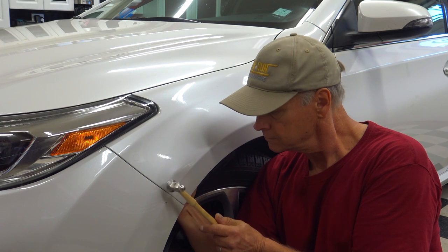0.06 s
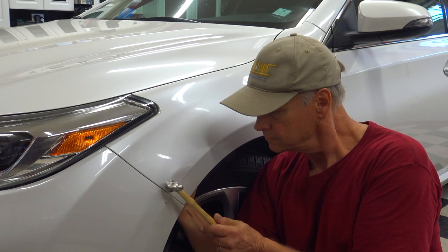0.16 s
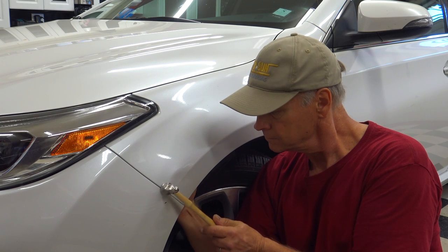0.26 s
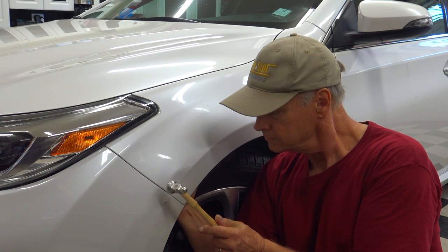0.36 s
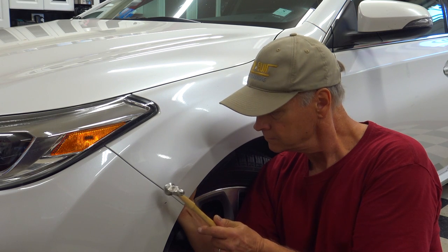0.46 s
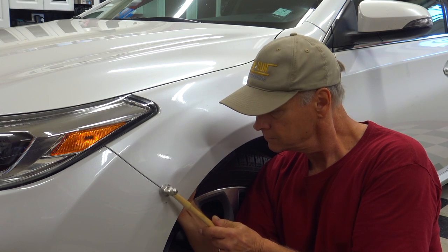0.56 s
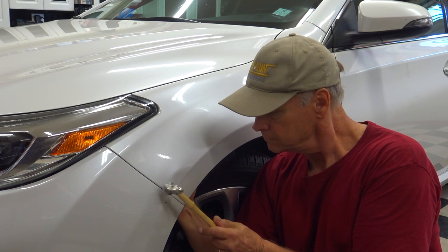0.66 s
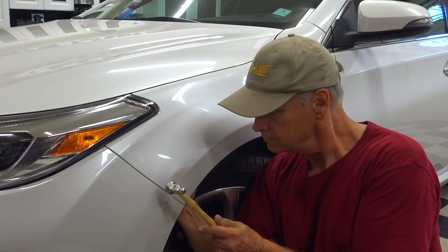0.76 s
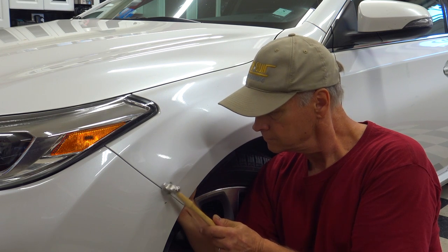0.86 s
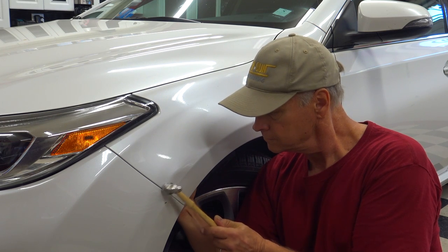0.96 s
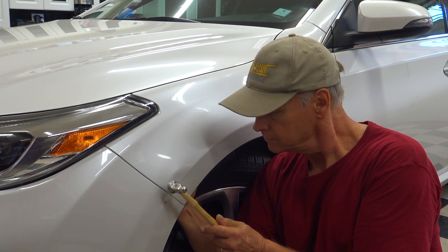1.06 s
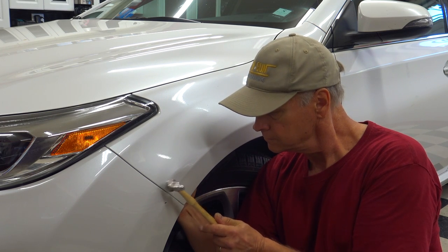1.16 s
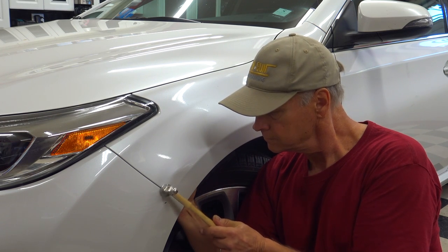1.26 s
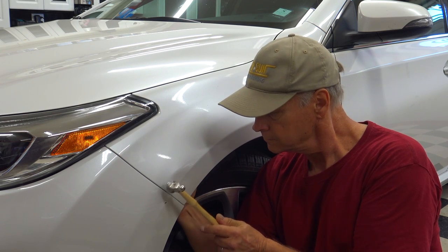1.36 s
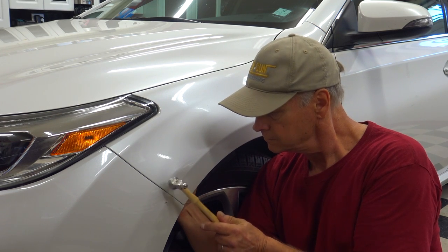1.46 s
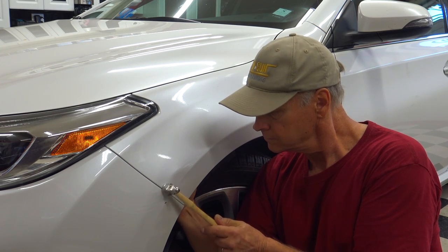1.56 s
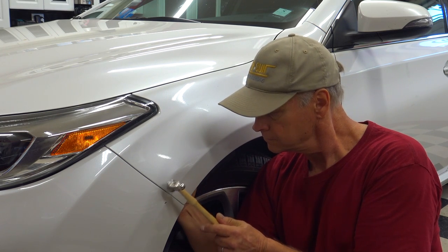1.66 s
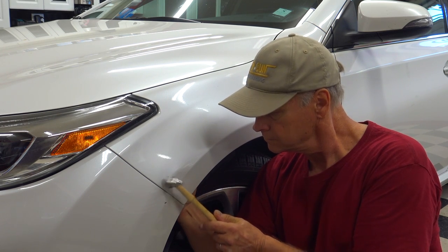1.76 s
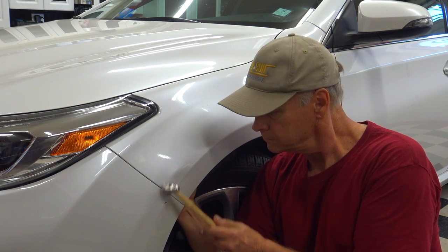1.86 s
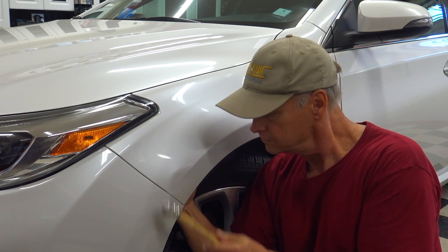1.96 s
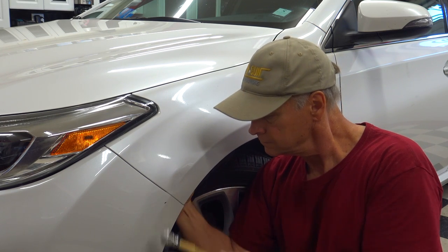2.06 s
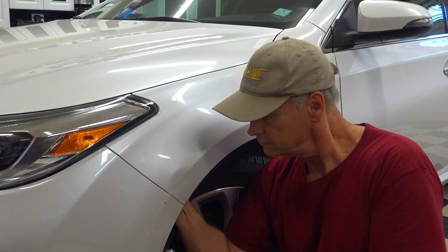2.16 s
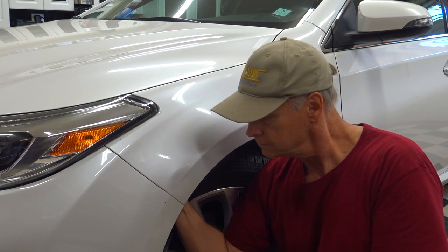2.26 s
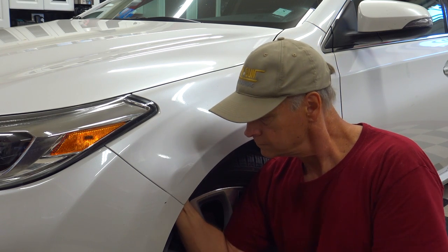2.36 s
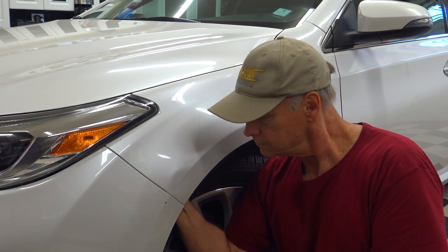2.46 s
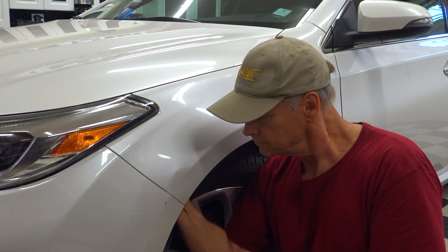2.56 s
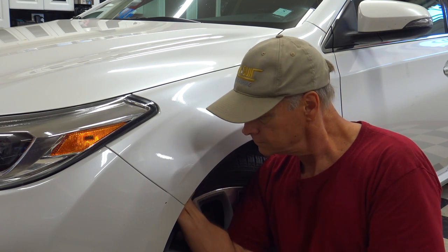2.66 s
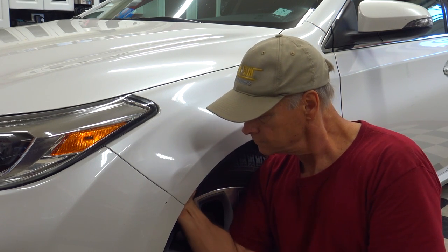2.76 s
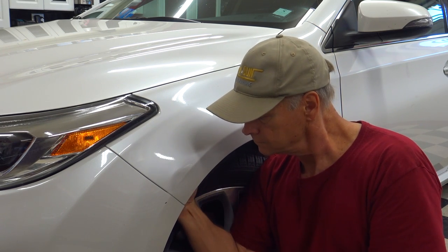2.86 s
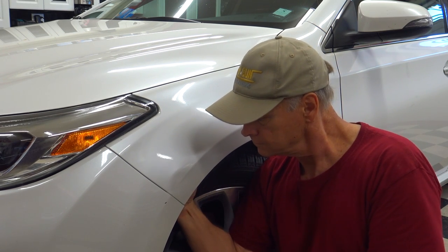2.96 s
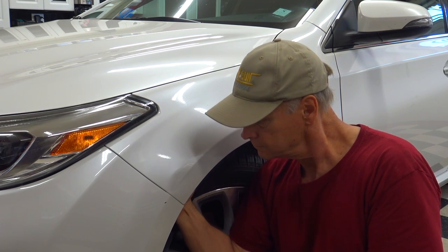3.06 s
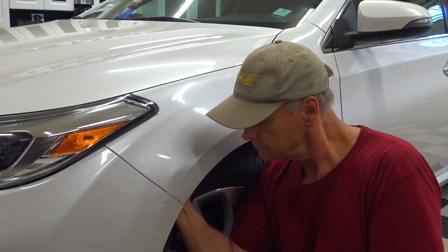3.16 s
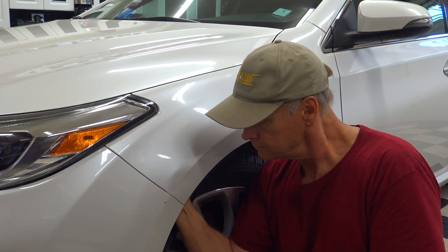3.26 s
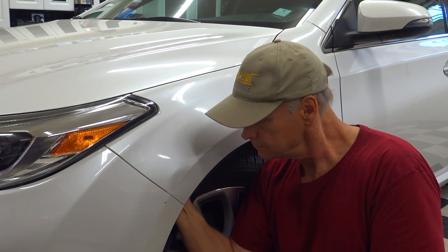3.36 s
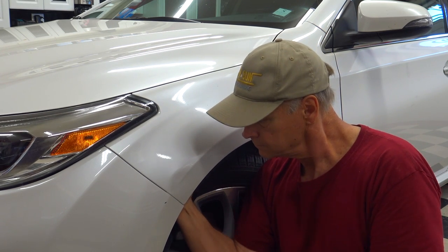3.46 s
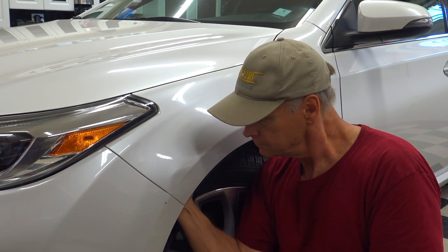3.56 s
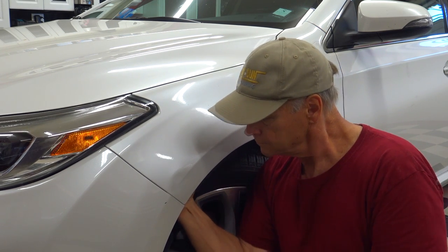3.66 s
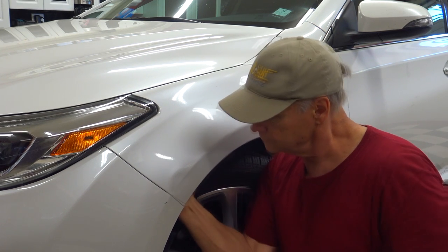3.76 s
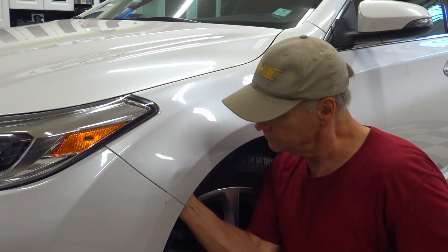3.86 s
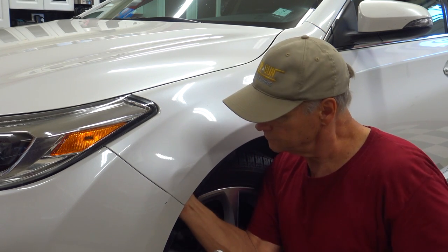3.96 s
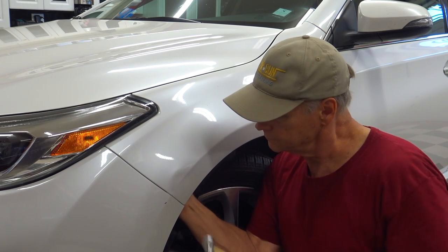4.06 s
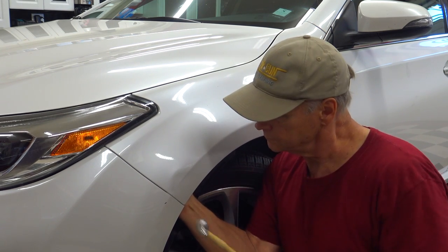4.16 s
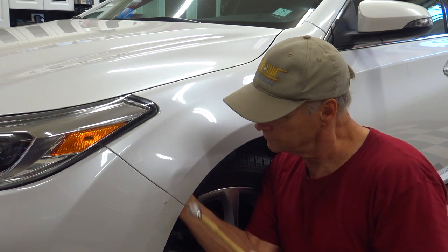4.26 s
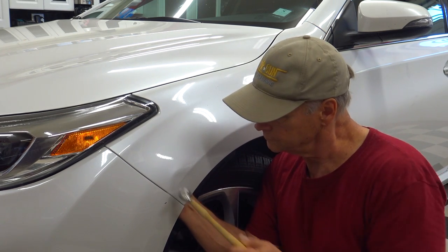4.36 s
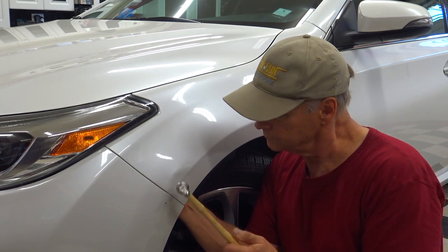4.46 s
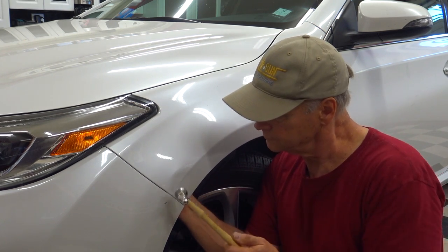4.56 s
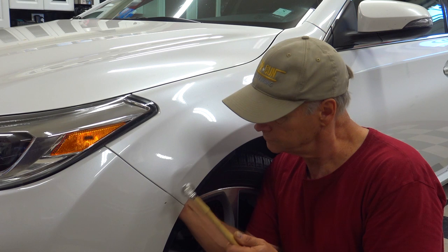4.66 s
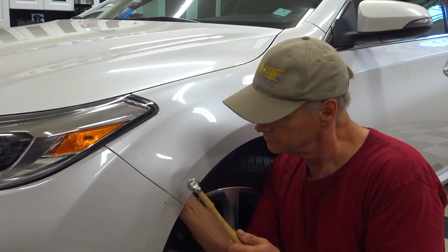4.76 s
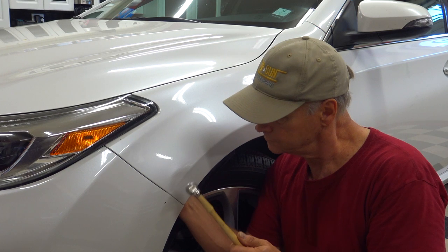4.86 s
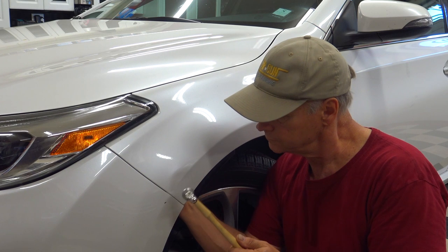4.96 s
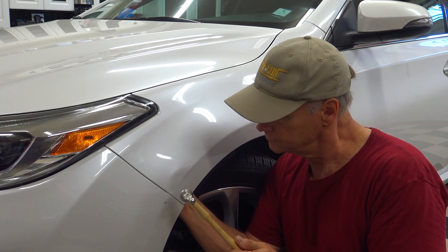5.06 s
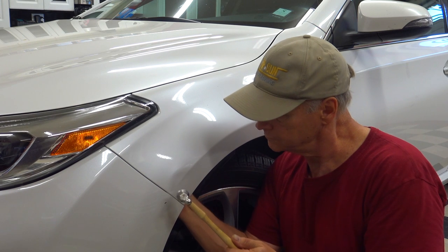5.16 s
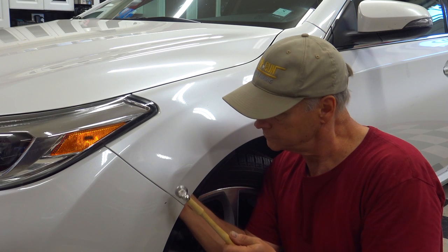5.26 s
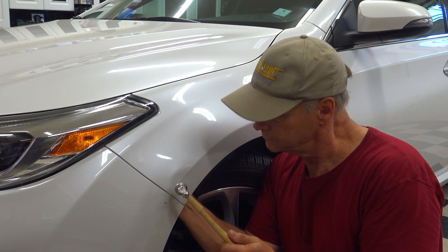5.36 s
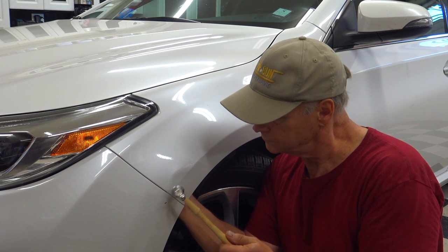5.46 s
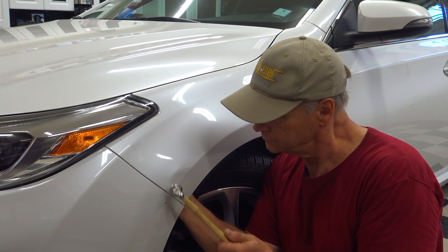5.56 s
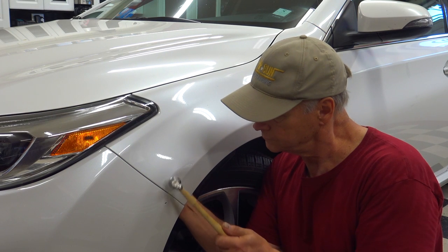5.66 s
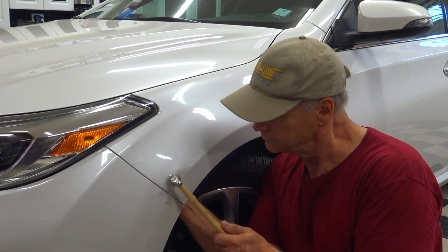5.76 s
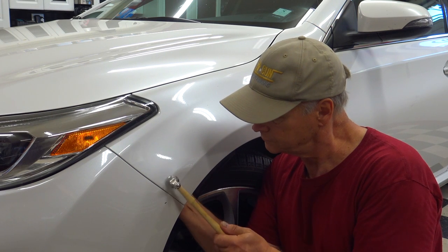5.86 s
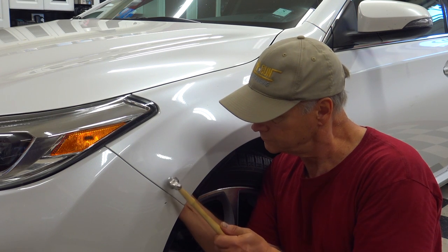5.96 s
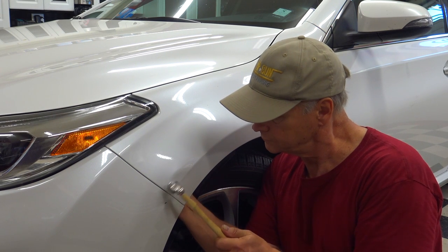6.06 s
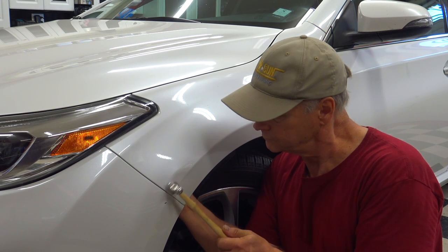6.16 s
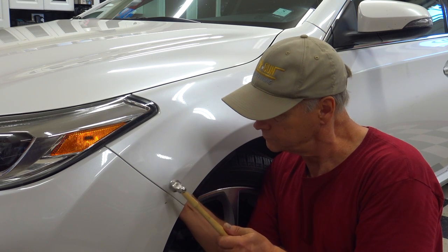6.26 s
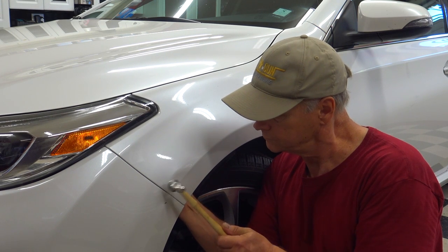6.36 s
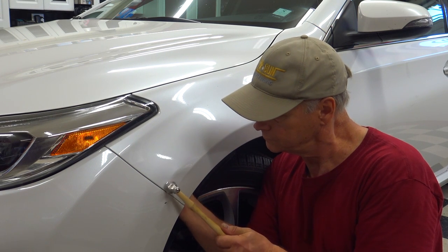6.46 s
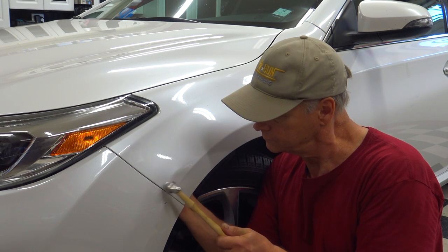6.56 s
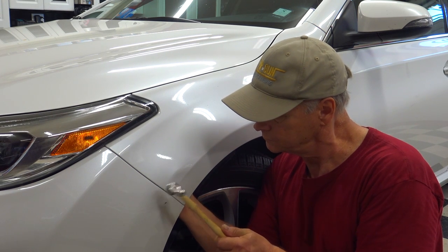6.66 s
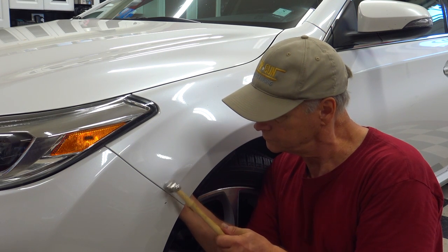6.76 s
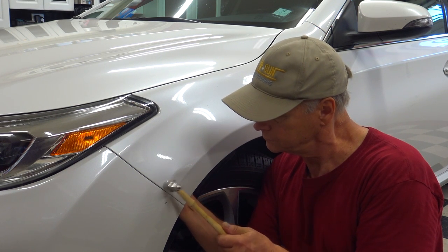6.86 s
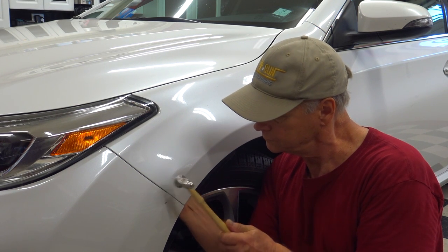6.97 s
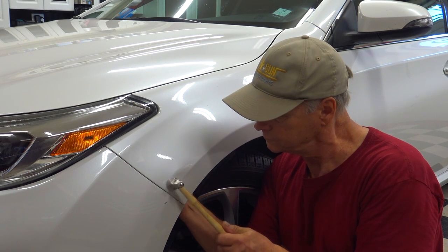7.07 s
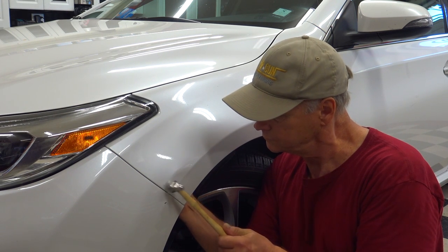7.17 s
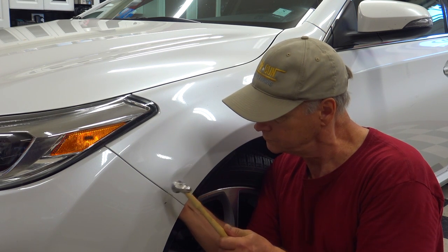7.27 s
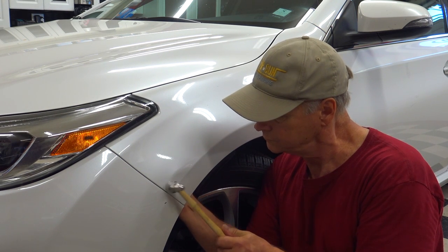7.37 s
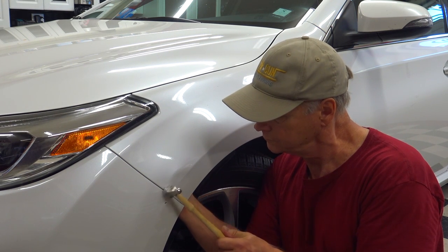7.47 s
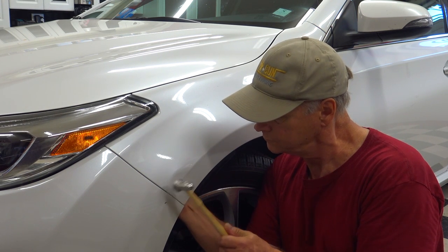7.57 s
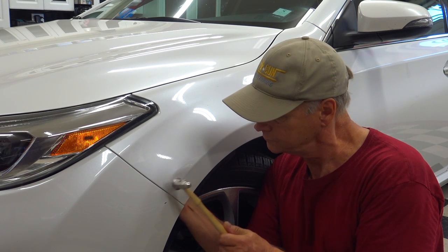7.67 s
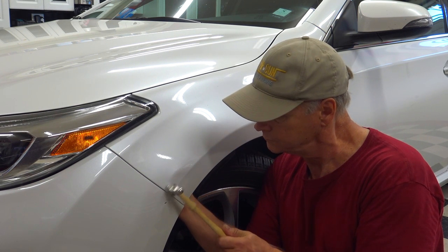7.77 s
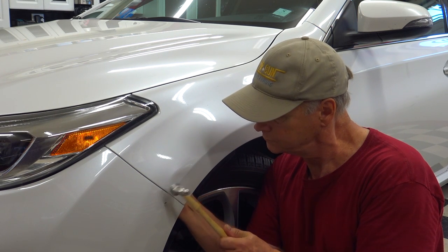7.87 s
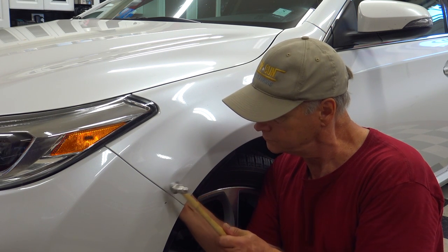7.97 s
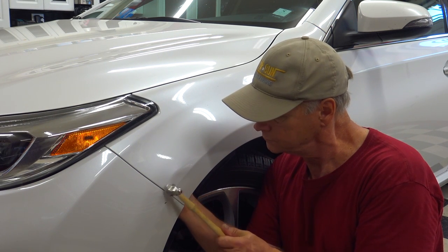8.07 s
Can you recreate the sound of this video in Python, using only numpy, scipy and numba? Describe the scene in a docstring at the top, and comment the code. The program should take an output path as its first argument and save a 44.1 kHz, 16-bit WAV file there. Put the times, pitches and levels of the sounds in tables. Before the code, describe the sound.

A small hammer cracks on block-backed sheet metal, pauses for soft bumps and rubbing while a fan machine starts, then strikes five firmer, clanging blows.

```python
"""A small hammer taps a car's steel fender backed by a hand-held block, in a hard-walled workshop.
Each tap is a crack, a noisy clash, ringing modes, a clink and an echo; after most, the block bounces back.
Seven taps, then knocks, ticks and scrapes as the block is shifted behind the panel, then five firmer taps.
Filtered noise and tones make the workshop's air and hum; a machine starts up about halfway and hums on.
A slow-reacting limiter lets hard attacks clip, then lets go as the echo fades."""
import sys
import numpy as np
from scipy import signal
from scipy.fft import rfft, irfft
from scipy.io import wavfile
from scipy.ndimage import uniform_filter1d, map_coordinates
from numba import njit

SR = 44100
rng = np.random.default_rng(int(sys.argv[2]) if len(sys.argv) > 2 else 0)


def waveform_to_disk(signal):
    """Save audio, clipped to [-1, 1], as 16-bit WAV at the path in sys.argv[1]."""
    frames = np.transpose(np.atleast_2d(signal))
    scaled = np.clip(frames, -1, 1) * 32767
    samples = np.round(scaled).astype(np.int16)
    wavfile.write(sys.argv[1], SR, samples)


N = 357210
t = np.arange(SR) / SR
HZ = np.fft.rfftfreq(SR, 1 / SR)
TIME = np.arange(N) / SR

# hammer taps: (time [s], force [dB], clang centre [Hz], clang boost [dB],
#   delay until the block bounces back [s]; 0 = it stays on the sheet)
HAMMER_TAPS = [(0.009, -4.5, 1490, 0.5, .058), (0.2834, -4.5, 1534, 2.5, 0), (0.606, -0.2, 2673, 14, .046),
               (0.9542, -4.5, 1855, 6.5, .043), (1.2829, -3, 2250, 7, .0335),
               (1.5945, -3.5, 1680, 3, .0386), (1.865, -4.5, 314.6, 4, .048), (6.536, 4, 1555, 9, 0),
               (6.8524, 5.5, 944, 7.5, 0), (7.1399, 7.5, 722, 5.5, .036), (7.4693, 7.5, 836, 3.5, .040),
               (7.8076, 3.5, 742, 3.5, 0)]
# dull colour of handling bumps: (frequency [Hz], level [dB])
THUD_COLOUR = [(25, -30), (70, 8), (130, 6.5), (330, 4), (700, -5.5), (1000, -8), (1500, -13),
               (3300, -26.5), (6000, -42), (15000, -48)]


def amp(db):
    """Decibels to gain."""
    return 10 ** (np.asarray(db) / 20)


def unit(x):
    """Scale to rms 1."""
    return x / np.sqrt(np.mean(x ** 2) + 1e-20)


def along(points, hz):
    """Interpolate (Hz, value) points on a log frequency axis."""
    f, v = np.transpose(points)
    return np.interp(np.log(hz + 1), np.log(f + 1), v)


def fade(t60_s):
    """One second of exponential decay, -60 dB at t60."""
    return np.exp(-np.log(1000) * t / t60_s)


def peak(centre_hz, width_hz):
    """A resonance of height 1."""
    return 1 / (1 + (2 * (HZ - centre_hz) / width_hz) ** 2)


def shelf(hz, corner_hz):
    """Rises from 0 to 1 around the corner."""
    return hz ** 2 / (hz ** 2 + corner_hz ** 2)


def ripple(spacing_hz):
    """Random crests and troughs along frequency, as a crowd of close modes of like strength makes them."""
    crests = map_coordinates(rng.standard_normal(SR // 2), [HZ / spacing_hz])
    return np.tanh(crests) * shelf(HZ, 900)


def noise(colour_db, size=SR):
    """Noise of rms 1 with the given spectrum."""
    return unit(irfft(rfft(rng.standard_normal(size)) * amp(colour_db), size))


def pulse(colour_db):
    """Minimum-phase answer of a body to one sharp push, with the energy of 1 ms at rms 1."""
    cepstrum = irfft(np.log(amp(colour_db)))
    # folding the cepstrum makes the response causal
    cepstrum[1:SR // 2] *= 2
    cepstrum[SR // 2:] = 0
    response = irfft(np.exp(rfft(cepstrum)))
    return unit(response) / np.sqrt(1000)


def echo(colour_db, build_s):
    """The workshop's answer: diffuse noise builds up, then each band dies at its own speed."""
    # decay of the workshop echo: (frequency [Hz], t60 [s])
    room_t60 = [(70, 0.59), (250, 0.47), (700, 0.57), (1800, 0.65), (4000, 0.71), (8000, 0.55),
                (14000, 0.31)]
    hz, s, bands = signal.stft(noise(colour_db), SR, nperseg=512)
    decay = np.exp(-np.log(1000) * s / along(room_t60, hz)[:, None])
    tail = signal.istft(bands * decay, SR, nperseg=512)[1][:SR]
    return tail * (1 - np.exp(-t / build_s))


def add(track, s, sound):
    """Mix a sound in at time s."""
    start = max(round(s * SR), 0)
    track[start:start + len(sound)] += sound[:N - start]


def air(treble_db):
    """Moving air: coloured noise, with its treble raised or lowered."""
    # workshop air: (frequency [Hz], level [dB])
    air_colour = [(20, -4), (35, 0.5), (90, 0.5), (150, -10), (400, -14), (750, -25.5), (1050, -20),
                  (1400, -30.5), (2400, -33), (3500, -32), (5000, -36), (15500, -38)]
    hz = np.fft.rfftfreq(N, 1 / SR)
    rush = noise(along(air_colour, hz), size=N)
    treble = irfft(rfft(rush) * shelf(hz, 3000), N)
    return rush + (amp(treble_db) - 1) * treble


def tone(pitch_hz):
    """A line of hum of rms 1; a wandering phase makes it slightly unsteady."""
    drift = map_coordinates(rng.standard_normal(64), [TIME * 4])
    return np.sqrt(2) * np.sin(2 * np.pi * pitch_hz * TIME + 0.35 * drift)


def background():
    """Steady workshop air and low hum; a machine with a fan runs up and adds its own rush and hum."""
    # machine lines: (frequency [Hz], relative level [dB])
    hum_lines = [(53.8, -1), (70, -3), (107.7, -0.5), (145.3, -12.5), (215.3, -16), (323, -19.5)]
    room_air_db, room_treble_db, low_hum_db = -51.5, -6, -50.5
    half_speed_s, run_up_s = 3.786, 0.04
    fan_air_db, fan_treble_db, machine_hum_db = -41, -2.5, -39.5  # at full speed
    room = amp(room_air_db) * air(room_treble_db) + amp(low_hum_db) * tone(75.4)
    running = (1 + np.tanh((TIME - half_speed_s) / (2 * run_up_s))) / 2
    hum = sum(amp(db) * tone(hz) for hz, db in hum_lines)
    machine = amp(fan_air_db) * air(fan_treble_db) + amp(machine_hum_db) * hum
    return room + running * machine


def fender():
    """Colour of the sheet [dB]: broad resonances under a crowd of fine ones."""
    # smooth colour of the struck sheet: (frequency [Hz], level [dB])
    sheet_colour = [(25, -34), (50, -27.5), (75, -0.5), (160, -1), (380, 5.5), (1000, -1), (2200, -7.5),
                    (3600, -11), (5000, -17), (7000, -24.5), (11000, -28), (15500, -32.5)]
    # broad resonances: (centre [Hz], width [Hz], boost [dB])
    broad_peaks = [(207, 54, 3), (481, 41, 4), (754, 140, 5.5), (1544, 630, 8.5), (2720, 120, 3),
                   (3280, 410, 6), (4470, 180, 1), (5230, 450, 2.5)]
    broad = along(sheet_colour, HZ) + sum(db * peak(hz, width) for hz, width, db in broad_peaks)
    fine = 4 * ripple(spacing_hz=12) + 4 * ripple(spacing_hz=70) * shelf(HZ, 3500)
    return broad + fine


def ring(contact_hz):
    """Decaying sheet modes, at new strengths for every blow; a soft contact favours the low ones."""
    # ringing modes: (frequency [Hz], mean relative level [dB], t60 [s])
    modes = [(71.15, -9, 0.42), (213, -12.5, 0.68), (390, -14, 0.41), (477, -9.5, 0.7), (509, -13, 0.94),
             (590, -7, 0.36), (622, 2, 0.48), (734, -9.5, 0.53), (1044, -15.5, 0.31), (1180, -5, 0.38),
             (1386, -5, 0.49), (1550, -10, 0.8), (1827, -12, 0.83), (2020, -12, 0.28), (2159, -13, 0.8),
             (2654, -12, 0.3), (2640, -16.5, 0.48), (3080, -11, 0.61), (3120, -14.5, 0.49),
             (3460, -15.5, 0.76), (4270, -24.5, .65), (5200, -25, 0.89), (5300, -25, 0.86),
             (6400, -18.5, 0.42), (7650, -27, .5), (9660, -27, .5)]
    out = np.zeros(SR)
    for hz, db, t60_s in modes:
        wave = np.sin(2 * np.pi * (hz * t + rng.random())) / (1 + (hz / contact_hz) ** 2)
        out += amp(db + 2 * rng.normal()) * fade(t60_s) * wave
    return out


def backed(steel, force_db, clang_hz, clang_db):
    """The backed spot sets the clang band; force adds treble, and pins the sheet so it drums less."""
    drum_db_at_0, drum_loss_per_db = 9.5, 0.77
    treble_db_at_0, treble_per_db = 8.5, 0.58
    clang = np.exp(-(np.log2((HZ + 1) / clang_hz) / 0.67) ** 2)
    brightness = shelf(HZ, 4000) - 0.34 * shelf(HZ, 10000)
    drum_db = drum_db_at_0 - drum_loss_per_db * force_db
    treble_db = treble_db_at_0 + treble_per_db * force_db
    return steel + drum_db * peak(619, 60) + clang_db * clang + treble_db * brightness


def hammer(steel):
    """Each tap: a crack, a short noise clash of bending waves, ringing modes and the room."""
    # ping of the spot under the hammer face: (centre [Hz], width [Hz], boost [dB])
    ping = [(430, 100, 8), (1229, 200, 6.5), (1453, 61, 5), (2240, 88, 7), (3620, 150, -1)]
    # clash thrown back by the floor and the car's body: (delay [s], level [dB])
    reflections = [(0.0135, -16.5), (0.0262, -21)]
    out = np.zeros(N)
    # the first wave comes from a small spot, which pings and radiates little bass
    spot = sum(db * peak(hz, width) for hz, width, db in ping)
    spot = spot + 5 * shelf(HZ, 4000) - 13 * (1 - shelf(HZ, 280))
    for s, force_db, clang_hz, clang_db, _ in HAMMER_TAPS:
        colour = backed(steel, force_db, clang_hz, clang_db)
        crack = amp(11.5) * pulse(colour + spot)
        clash = amp(5) * noise(colour + spot) * fade(0.045)
        direct = crack + clash
        ringing = amp(-11.5) * ring(contact_hz=14000)
        add(out, s, amp(force_db) * (direct + echo(colour, build_s=0.034) + ringing))
        for delay_s, db in reflections:
            add(out, s + delay_s, amp(force_db + db) * direct)
    return out


def clinks(steel):
    """Steel on steel: the hammer head rings for a few milliseconds at each tap, as a noise burst."""
    # head resonances: (centre [Hz], width [Hz], boost [dB])
    head_peaks = [(1480, 350, 12.5), (3570, 430, 12.5), (4420, 500, 9)]
    clink_db, clink_t60_s = 7, 0.0092  # level relative to tap force
    out = np.zeros(N)
    head = sum(db * peak(hz, width) for hz, width, db in head_peaks)
    head = head - 22 * (1 - shelf(HZ, 600)) - 4 * shelf(HZ, 7000)
    for s, force_db, clang_hz, clang_db, _ in HAMMER_TAPS:
        colour = backed(steel, force_db, clang_hz, clang_db) + head
        add(out, s, amp(force_db + clink_db) * noise(colour) * fade(clink_t60_s))
    return out


def bounces(steel):
    """The block is thrown off the sheet and lands on the same spot with a bright clack."""
    bounce_db = -2  # relative to tap force
    out = np.zeros(N)
    for s, force_db, clang_hz, clang_db, delay_s in HAMMER_TAPS:
        if delay_s > 0:
            colour = backed(steel, force_db, clang_hz, clang_db)
            colour = colour + 2 * shelf(HZ, 5000) + 6 * shelf(HZ, 500)
            clack = amp(7) * pulse(colour) + amp(1) * noise(colour) * fade(0.053)
            trail = amp(-14) * echo(colour, build_s=0.024)
            add(out, s + delay_s, amp(force_db + bounce_db) * (clack + trail))
    return out


def slides():
    """The block drags over the sheet: tiny slips make a rumble and a hiss, and the room trails them."""
    # strokes: (centre [s], Gaussian spread [s], pressure [dB])
    strokes = [(2.67, 0.033, -58), (2.864, 0.016, -51), (3.155, 0.028, -45), (3.391, 0.03, -41),
               (3.729, 0.037, -46), (3.939, 0.057, -37.5), (4.592, 0.037, -24), (4.819, 0.011, -40),
               (4.974, 0.04, -32.5), (5.42, .033, -23), (5.701, 0.016, -31), (6.378, 0.034, -34.5)]
    # rumble colour: (frequency [Hz], level [dB])
    rumble_colour = [(40, -43), (110, -1.5), (200, -4), (400, -13), (700, -27), (1500, -28.5), (4000, -53),
                     (15000, -68)]
    # hiss colour: (frequency [Hz], level [dB])
    hiss_colour = [(100, -20), (600, 3.5), (1500, 1), (2400, 2), (3400, 6.5), (5000, -7), (10000, -11),
                   (15500, -16)]
    # rumble follows pressure fully, hiss only in part
    usual_pressure_db, usual_hiss_db, hiss_per_db = -36.5, -49.5, 0.5
    out, middle_s = np.zeros(N), 0.25
    for s, spread_s, pressure_db in strokes:
        stroke = np.exp(-0.5 * ((t - middle_s) / spread_s) ** 2)
        roughness = unit(uniform_filter1d(rng.standard_normal(SR), size=150))
        slips = unit(amp(1.9 * roughness))
        hiss_db = usual_hiss_db + hiss_per_db * (pressure_db - usual_pressure_db)
        for points, db in ((rumble_colour, pressure_db), (hiss_colour, hiss_db)):
            colour = along(points, HZ)
            add(out, s - middle_s, amp(db) * stroke * slips * noise(colour))
            add(out, s, amp(db + 1.5) * echo(colour, build_s=0.071))
    return out


def knocks():
    """Soft bumps of the block set the whole panel booming; a brighter bump wakes higher modes."""
    # bumps: (time [s], level [dB], boom [dB], treble [dB])
    bumps = [(2.869, -34, -8, 4), (3.2784, -29.5, -16, -12.5), (3.312, -34.5, -10.5, -26),
             (3.386, -35.5, 2, 4), (3.54, -42.5, 8, -8), (4.092, -29.5, 3.5, -42), (4.151, -30, -1, -43),
             (4.63, -28, 6.5, -10), (5.195, -18.5, 8, -5.5)]
    out = np.zeros(N)
    for s, db, boom_db, treble_db in bumps:
        colour = along(THUD_COLOUR, HZ) + treble_db * shelf(HZ, 610) + 3 * ripple(spacing_hz=120)
        colour += 6 * peak(133.5, 30) + 7 * peak(215, 54) + 5 * peak(450, 150) + 5 * peak(730, 120)
        boom = amp(boom_db - 0.5) * np.sin(2 * np.pi * 76 * t) * fade(0.45) * (1 - np.exp(-t / 0.0065))
        bump = amp(6) * noise(colour) * fade(0.1)
        bump += amp(-7) * ring(contact_hz=420 * amp(treble_db / 4))
        bump *= 1 - np.exp(-t / 0.0006)  # soft onset
        add(out, s, amp(db) * (bump + boom + amp(-2.5) * echo(colour, build_s=0.013)))
    return out


def ticks(steel):
    """Metal barely touches metal as the tools are handled: a light noise tick over a brief thud."""
    # touches: (time [s], level [dB], thud [dB])
    touches = [(3.825, -42, 5), (3.853, -45, 12.5), (3.901, -32, 3), (3.928, -39.5, -12), (3.974, -41.5, 4),
               (4.177, -35, 5), (4.266, -38.5, 8), (5.154, -41.5, -10)]
    out = np.zeros(N)
    colour = steel + 17 * shelf(HZ, 1040) - 10 * shelf(HZ, 3600) + 8 * peak(2200, 700)
    for s, db, thud_db in touches:
        tick = amp(2) * noise(colour) * fade(0.028) + amp(-15) * echo(colour, build_s=0.01)
        thud = amp(thud_db) * noise(along(THUD_COLOUR, HZ)) * fade(0.069)
        add(out, s, amp(db) * (tick + thud))
    return out


def scene():
    """Sum of all sources, one channel."""
    steel = fender()
    taps = hammer(steel) + clinks(steel) + bounces(steel)
    handling = slides() + knocks() + ticks(steel)
    return (background() + taps + handling)[None]


@njit
def follower(level, attack, release):
    """A level detector that rises fast and falls slowly (time constants in samples)."""
    out, held = np.empty_like(level), 0.0
    for i in range(len(level)):
        held += (level[i] - held) / (attack if level[i] > held else release)
        out[i] = held
    return out


def record(dry):
    """The limiter reacts too late for hard attacks, which clip, then lets go as the echo fades."""
    attack_s, release_s, threshold_db, top_hz = 0.0023, 0.047, -6.5, 15900
    level = follower(np.abs(dry[0]), attack_s * SR, release_s * SR)
    limited = np.clip(dry / np.maximum(1, level / amp(threshold_db)), -1, 1)
    passband = np.fft.rfftfreq(N, 1 / SR) < top_hz
    return np.clip(irfft(rfft(limited) * passband, N), -1, 1)


dry = scene()
out = record(dry)
waveform_to_disk(out)
```